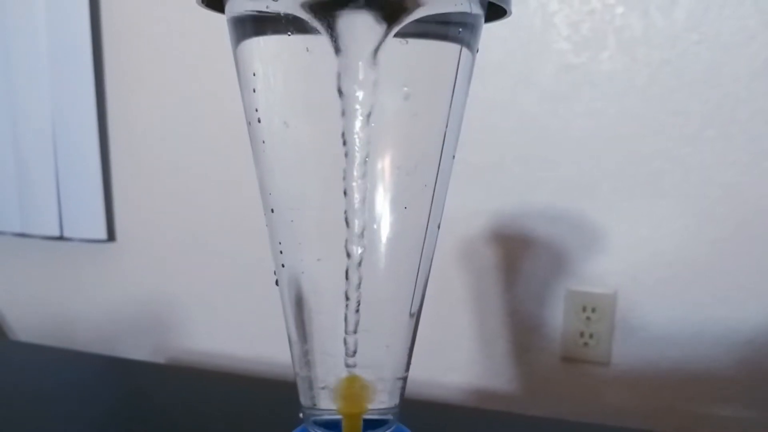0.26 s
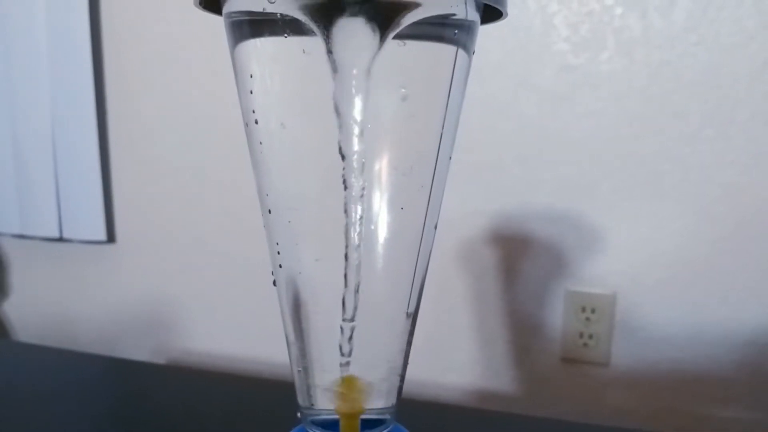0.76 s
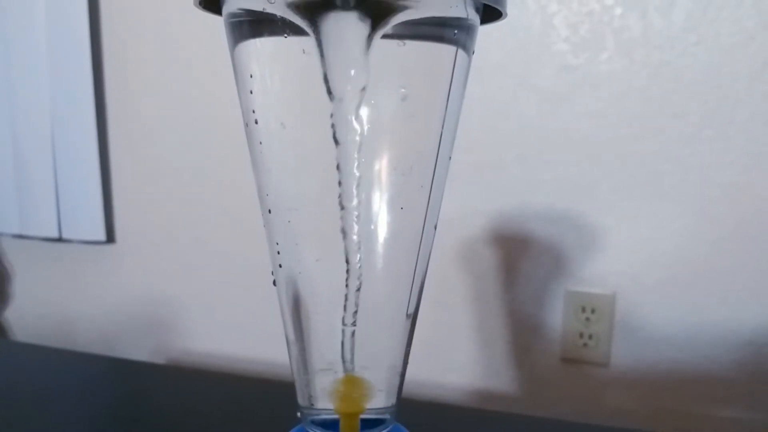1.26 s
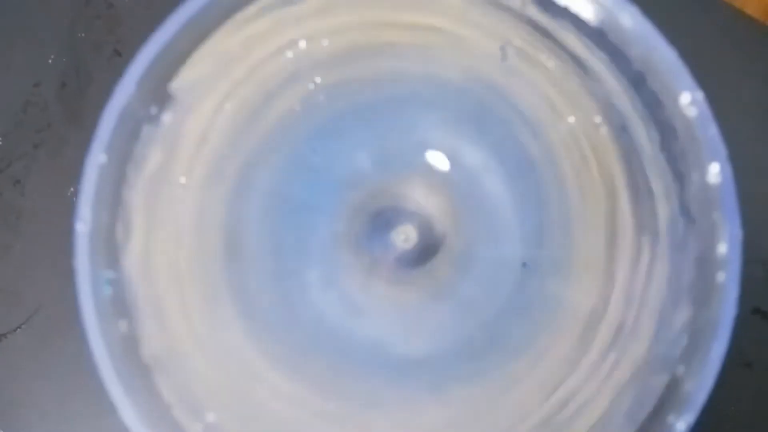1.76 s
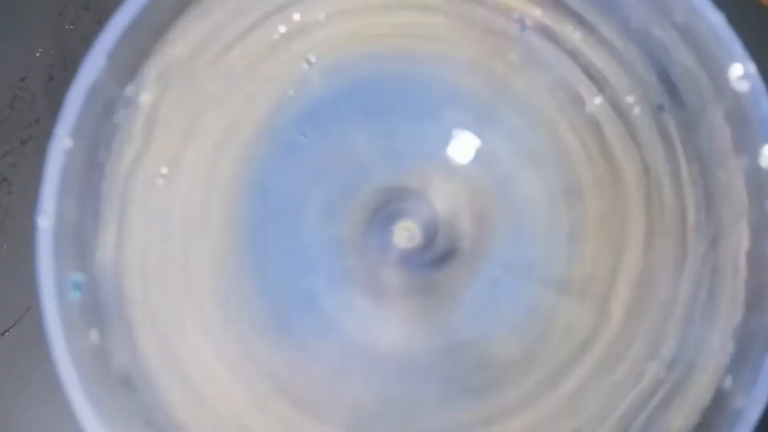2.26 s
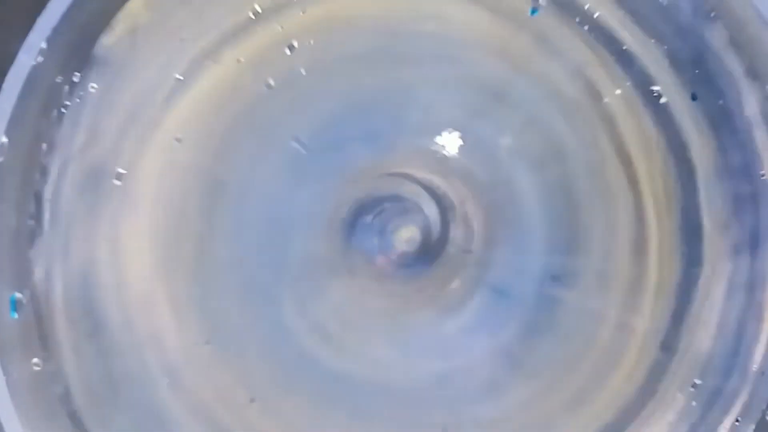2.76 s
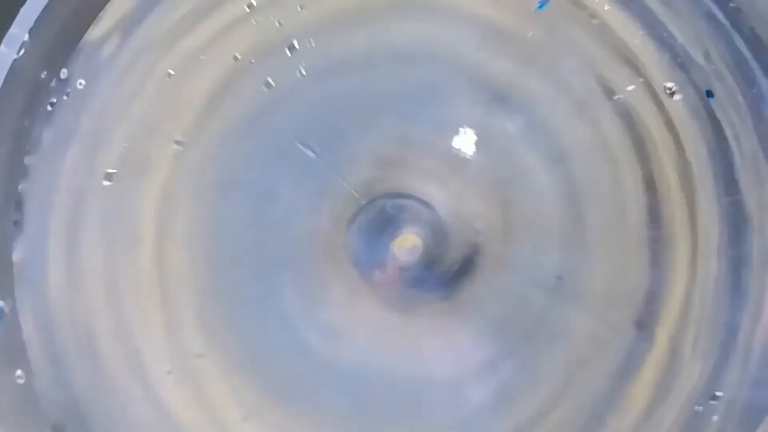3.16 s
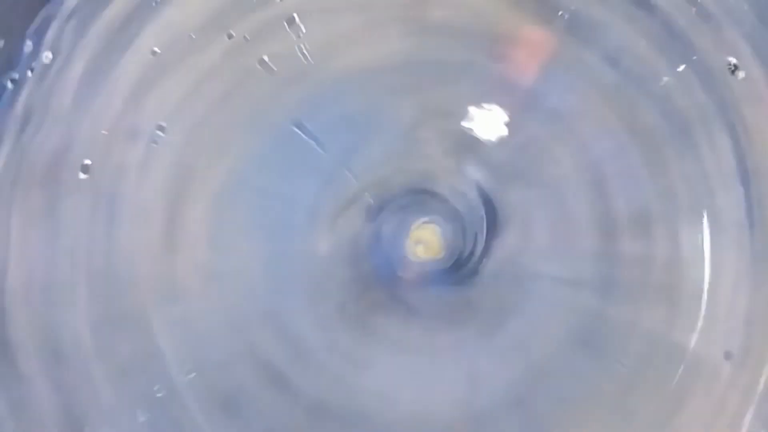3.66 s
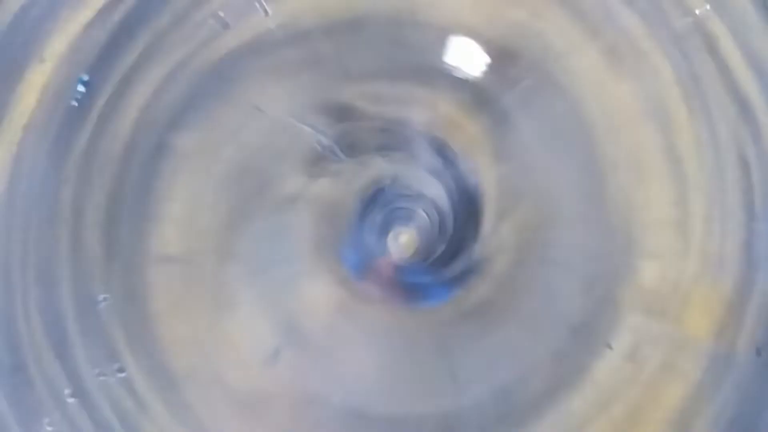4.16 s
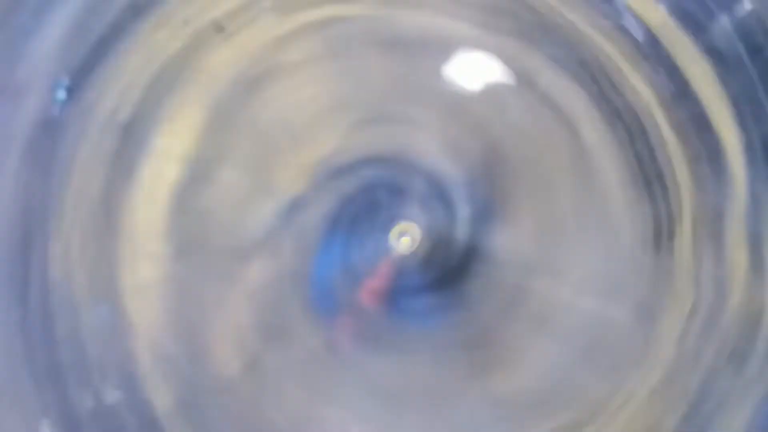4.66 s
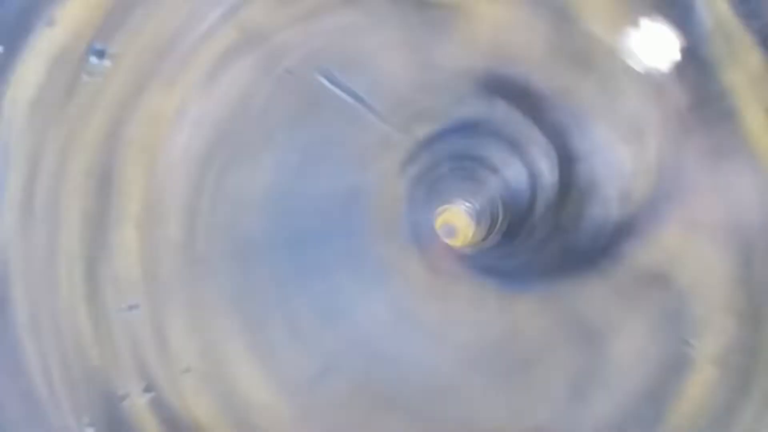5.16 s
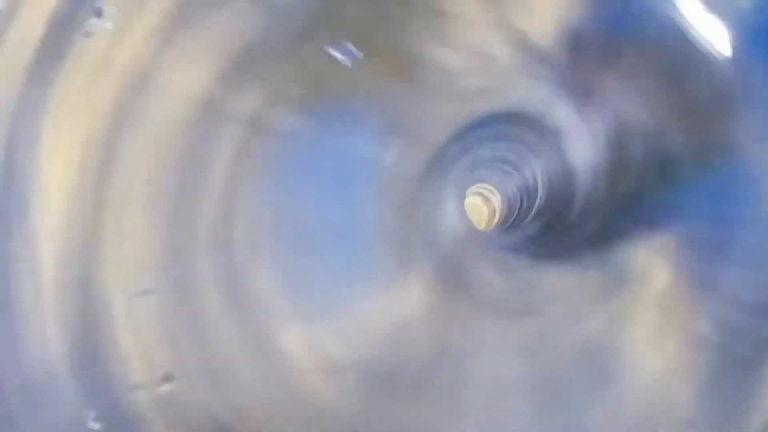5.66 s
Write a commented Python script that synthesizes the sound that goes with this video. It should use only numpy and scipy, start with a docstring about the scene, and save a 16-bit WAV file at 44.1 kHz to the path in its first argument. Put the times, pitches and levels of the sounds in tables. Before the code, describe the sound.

Bubbles fizz, crackle and ping in a small motor-driven whirlpool, growing into close, gulping gurgles above a faint low hum.

```python
"""Bubbles fizz, pop and ping in a toy water vortex, ringing the air in its clear plastic cone.
A small motor spins an impeller at the foot; the air core dips into the blades in gulps, a few a second,
and is chopped into bubbles. Behind them are the motor's faint hum and the low wash of a small room.
The stereo microphone stands first beside the cone, where a few soft swishes are heard, then from
about 1.75 s just above the open mouth, coming closer."""
import sys
import numpy as np
from scipy import signal
from scipy.fft import rfft, irfft
from scipy.io import wavfile
from scipy.ndimage import uniform_filter1d, map_coordinates

SR = 44100
rng = np.random.default_rng(int(sys.argv[2]) if len(sys.argv) > 2 else 0)


def store_pcm(level_fs):
    """Save levels as 16-bit WAV."""
    pcm = np.round(np.clip(level_fs, -1, 1) * 32767).astype(np.int16)
    wavfile.write(sys.argv[1], SR, np.atleast_2d(pcm).T)


N = 261072
TIME = np.arange(N) / SR
LEAVE_S, ARRIVE_S = 1.728, 1.762  # the side position fades out, the overhead position fades in
SHAFT_HZ = 44.35
CONE_SHIFT = 0.021  # share by which the resonances move as the water heaves

# The loudest bubbles, bursting with a crack.
# Each row: start in seconds, relative level in dB, pitch in Hz, relative share of fine spray in dB.
LOUD_POPS = [(0.1293, -41, 3390, 4), (0.3144, -34, 4220, -9), (0.3222, -30.5, 6630, -20),
             (0.5117, -29, 3350, -1), (0.78, -33, 4460, -6), (0.823, -36, 4150, -15),
             (0.842, -39, 5000, -6), (1.497, -33, 4440, -19), (1.578, -33.5, 5600, -7),
             (1.691, -36.5, 4470, -1), (1.775, -18.5, 4370, -35), (1.789, -20, 3420, -31),
             (1.8548, -27.5, 3500, -28), (1.8777, -18.5, 2980, -24), (1.8922, -27.5, 3370, -20),
             (1.9648, -24.5, 5400, 10), (2.0017, -29, 3940, 11), (2.1007, -28, 2880, -12),
             (2.1173, -25.5, 4180, 7), (2.128, -17.5, 4260, -13), (2.142, -25.5, 2800, -21),
             (2.16, -23, 2290, -23), (2.1737, -26.5, 2100, -7), (2.201, -22, 2600, -6),
             (2.2434, -30, 2200, -25), (2.255, -25, 2200, -37), (2.31, -32, 4900, -9),
             (2.333, -24.5, 4600, -10), (2.372, -25, 7200, 19), (2.467, -35, 6050, 18),
             (2.5414, -32, 2800, -20), (2.5577, -27, 3450, -12), (2.5947, -23.5, 3000, 4),
             (2.7395, -31, 2250, -25), (2.765, -30, 2290, -30), (2.7704, -25, 2140, -8),
             (2.780, -28.5, 2180, -8), (2.801, -23, 2750, -17), (2.8072, -21.5, 2730, -10),
             (2.8859, -23, 4200, -17), (2.9248, -29, 2770, -25), (2.951, -24, 2680, -41),
             (2.9641, -12, 3850, -39), (2.9791, -13.5, 4500, -47), (3.137, -25.5, 3380, -24),
             (3.167, -26.5, 2410, -25), (3.2209, -21, 3000, -26), (3.229, -22.5, 2540, -34),
             (3.2479, -27, 2600, -10), (3.2667, -26, 2580, 3), (3.2706, -18.5, 2940, -11),
             (3.283, -18.5, 1800, 0), (3.294, -28, 2830, -9), (3.305, -16, 3350, -11.5),
             (3.3619, -40, 2000, -19), (3.371, -26.5, 2640, -18), (3.38, -27.5, 2600, -5),
             (3.4053, -25, 3000, -23), (3.416, -19.5, 2670, -30), (3.4295, -22.5, 2540, -8),
             (3.439, -21.5, 3070, -6), (3.4457, -17, 3420, -23), (3.452, -20.5, 3500, -7),
             (3.461, -27, 3360, -3), (3.4738, -19.5, 3230, -19), (3.4848, -22.5, 3120, -11.5),
             (3.516, -26.5, 3100, -26), (3.6148, -25.5, 2900, 0), (3.6249, -25.5, 3200, -11),
             (3.7124, -34, 2160, -27), (3.7635, -29.5, 3920, -21), (3.92, -27.5, 3400, -18),
             (3.956, -20.5, 4100, -35), (3.979, -23.5, 4200, -9), (4.0009, -30.5, 2010, -7),
             (4.0133, -26.5, 1600, -18), (4.111, -20.5, 1290, -7.5), (4.149, -23.5, 2020, 18),
             (4.188, -29, 1670, -14), (4.3543, -19.5, 1870, -43), (4.4102, -33.5, 2030, 2),
             (4.4823, -26.5, 6300, 14), (4.5301, -29.5, 1900, -26), (4.593, -26, 2130, -24),
             (4.635, -25.5, 1400, -9), (4.667, -33, 1600, -13), (4.9815, -26.5, 1860, -30),
             (5.006, -24.5, 3130, -34), (5.0724, -23, 1830, -16), (5.2131, -30, 1600, -41),
             (5.2506, -29, 3240, -22), (5.2601, -25, 3200, -16), (5.2821, -27.5, 2700, -15),
             (5.36, -25.5, 1750, -20), (5.382, -24, 2270, -23), (5.3976, -22, 2260, -29),
             (5.411, -30, 1950, -28), (5.466, -18.5, 3480, -12.5), (5.549, -11, 2900, -36),
             (5.5614, -21.5, 3630, -6.5), (5.585, -21.5, 1820, -30), (5.6, -23, 2100, -5),
             (5.6283, -23, 1700, -11), (5.635, -23, 2270, -14), (5.6537, -27, 1600, -17),
             (5.676, -19, 1270, -16), (5.689, -17, 2150, -5.5), (5.7007, -27, 1950, -20),
             (5.713, -24, 2430, -17), (5.746, -24.5, 2400, -12.5), (5.796, -28, 2600, -6),
             (5.8076, -26, 1700, -6), (5.82, -11, 3230, -8.5), (5.8303, -19.5, 2380, -9),
             (5.8454, -18, 1970, -24), (5.865, -25, 1900, 4.5), (5.901, -22, 1840, -11),
             (5.912, -28, 2200, 4)]


def undb(db):
    """Decibels to gain."""
    return 10 ** (np.asarray(db) / 20)


def rms(x):
    """Root mean square."""
    return np.sqrt(np.mean(x ** 2)) + 1e-12


def curves(table):
    """Each column of a timed table, sample by sample."""
    s, *columns = np.transpose(table)
    return [np.interp(TIME, s, c) for c in columns]


def response(points, modes=(), size=4096):
    """Causal impulse response of a smooth colour (Hz, dB) with resonances (Hz, width in Hz, dB) on top."""
    hz = np.arange(size // 2 + 1) * SR / size
    point_hz, point_db = np.transpose(points)
    db = np.interp(np.log(hz + 1), np.log(point_hz), point_db)
    db += sum(lift / (1 + (2 * (hz - f) / width) ** 2) for f, width, lift in modes)
    cepstrum = irfft(np.log(undb(db)))
    cepstrum[1:size // 2] *= 2  # fold to minimum phase
    cepstrum[size // 2 + 1:] = 0
    return irfft(np.exp(rfft(cepstrum)))[:size // 2]


def through(x, ring):
    """Pass a sound through an impulse response."""
    return signal.fftconvolve(x, ring)[:len(x)]


def band_noise(hz, width_hz):
    """Noise in one resonance, rms 1."""
    x = signal.lfilter(*signal.iirpeak(hz, hz / width_hz, SR), rng.standard_normal(N))
    x = signal.lfilter(*signal.iirpeak(hz, hz / width_hz / 2, SR), x)
    return x / rms(x)


def walk(rate_hz):
    """A smooth random drift with a spread near 1."""
    return map_coordinates(rng.standard_normal(1024), [TIME * rate_hz], order=2, mode="wrap")


def rumble(db):
    """Low wash of the swirling water and the room, behind everything."""
    # Colour of the wash. Each row: frequency in Hz, relative level in dB.
    colour = [(20, -6), (45, -8.5), (70, 0), (110, 3), (180, 3), (280, -3), (450, -12), (900, -9),
              (3000, -10), (15000, -27)]
    wash = through(rng.standard_normal(N), response(colour))
    return undb(db + walk(5.88)) * wash / rms(wash)


def room(x, wet_db, t60_s, echo_db, echo_s):
    """One near reflection and a short diffuse tail whose pattern changes as the microphone moves."""
    t = TIME[:SR // 2]
    tails = rng.standard_normal((2, len(t))) * undb(-60 * t / t60_s) * np.minimum(t / 0.0031, 1)
    one, other = (through(x, tail / np.sqrt(np.sum(tail ** 2))) for tail in tails)
    turn = np.pi * 0.791 * TIME
    echo = np.pad(x, (int(echo_s * SR), 0))[:N]
    return x + undb(echo_db) * echo + undb(wet_db) * (np.cos(turn) * one + np.sin(turn) * other)


def motor_hum(overhead):
    """Harmonics of the shaft, whose speed wavers with the load."""
    # Each row: multiple of the shaft rate, level beside the cone in dB, level above it in dB.
    harmonics = [(3, -71, -75.5), (5, -83.5, -73), (8, -86.5, -85)]
    turns = np.cumsum(SHAFT_HZ * (1 + 0.0068 * walk(7))) / SR
    return sum(np.sqrt(2) * undb(above_db if overhead else beside_db) * np.sin(2 * np.pi * k * turns)
               for k, beside_db, above_db in harmonics)


def swishes():
    """Soft broad swishes swell and fade beside the cone."""
    # Each row: peak time in seconds, half-length in seconds, level in dB, tilt (higher is brighter).
    swells = [(0.27, 0.072, -60, -9), (0.383, 0.053, -49, 16), (0.438, 0.062, -58, -5),
              (1.485, 0.073, -51, -0.5), (1.696, 0.04, -59.5, -8.5)]
    out = 0
    for s, length, db, tilt in swells:
        colour = [(200, -41.5), (500, -14.0), (4000, 3 * tilt), (16000, 5 * tilt - 45)]
        noise = through(rng.standard_normal(N), response(colour))
        out += undb(db) * noise / rms(noise) * np.exp(-.5 * ((TIME - s) / length) ** 2)
    return out


def whistles():
    """Whistling and sizzling bands come and go above the mouth, flickering."""
    # Each row: peak time in seconds, half-length in seconds, centre in Hz, width in Hz, level in dB.
    bands = [(2.155, .2, 14800, 1100, -70), (2.194, 0.0022, 14300, 890, -39.5), (3, 0.017, 4430, 695, -54),
             (3.722, .13, 3540, 190, -57.5), (4.0, 0.2, 7440, 302, -59.5), (4.648, 0.43, 7420, 452, -61.5),
             (4.386, 0.041, 12400, 1800, -79), (4.58, 0.046, 12800, 5000, -60),
             (4.745, 0.016, 9000, 6000, -57), (5.8, 0.27, 11600, 600, -68), (5.85, 0.17, 13900, 3000, -66)]
    return sum(undb(db + walk(32)) * band_noise(hz, width) * np.exp(-.5 * ((TIME - s) / length) ** 2)
               for s, length, hz, width, db in bands)


def knocks(gain_db, decay_s):
    """Short dull knocks among the pops."""
    # Each row: start in seconds, peak in dB before gain_db.
    blows = [(3.279, -48), (4.012, -50), (4.635, -48.5)]
    dull = response([(60, 5), (250, 6), (900, 9), (2500, -17), (9000, -32)])
    t = TIME[:len(dull)]
    out = np.zeros(N)
    for s, db in blows:
        blow = through(rng.standard_normal(len(t)) * np.exp(-t / decay_s), dull)
        out[int(s * SR):][:len(blow)] += undb(db + gain_db) * blow / np.abs(blow).max()
    return out


def gulps(lag_s=0, stretch=1, rise_share=0.83):
    """Power of large bubbles, small bubbles and boom: each gulp swells quickly and dies more slowly."""
    # The core dips into the blades. Each row: peak time in seconds, fall time in seconds,
    # strength in dB, share of small bubbles in dB, share of boom in dB.
    dips = [(0.01, 0.037, -63, 11.5, -26), (0.283, 0.029, -60, 8.5, -22), (0.43, 0.039, -57, 3, -25),
            (0.72, 0.047, -66.5, 13, -10), (0.836, 0.046, -61.5, 9, -13), (0.988, 0.065, -58.5, 7.5, -12),
            (1.14, 0.044, -61.5, 7, -4), (1.412, 0.083, -56.5, 4, -14), (1.572, 0.028, -62, 8, 3),
            (1.706, 0.034, -52, 2.5, -3), (1.78, 0.022, -52.5, 4, -23), (1.875, 0.036, -50.5, 3.5, -10),
            (2.13, 0.093, -46.5, -2, -11), (2.282, 0.054, -53, -1, -3.5), (2.563, 0.051, -45.5, -1, -10.5),
            (2.792, .045, -45.5, -0.5, -16), (2.968, 0.035, -44, -0.5, -12.5),
            (3.132, 0.055, -52, -6.5, -4.5), (3.301, 0.076, -46.5, -3.5, -4.5),
            (3.445, 0.073, -47, -1.5, -6), (3.625, 0.053, -48, 0.5, -5.5), (3.76, 0.036, -54.5, 0.5, -5.5),
            (3.92, 0.07, -49.5, -3, -12), (4.111, 0.056, -41.5, -5, -11.5), (4.384, .035, -47, -2, -29),
            (4.576, .07, -42.5, -5.5, -16), (4.794, 0.057, -47, -3, -17), (4.987, 0.054, -45, -5, -25),
            (5.114, 0.052, -52, -5, -9), (5.24, .05, -44.5, 0.5, -22), (5.405, 0.037, -44, -1, -15),
            (5.607, 0.045, -48, -1.5, -5.5), (5.685, 0.063, -44, -4.5, -9.5), (5.835, .04, -42.5, -2, -5.5)]
    power = np.zeros((3, N))
    for s, length, db, small_db, boom_db in dips:
        age = (TIME - s - lag_s) / (length * stretch)
        swell = np.exp(-np.where(age < 0, age / rise_share, age) ** 2)
        power += np.outer(undb([db, db + small_db, db + boom_db]) ** 2, swell)
    return power


def boom(gain_db, wash_db, hz=220):
    """Each gulp sets the air in the funnel booming on one throbbing note, with a soft wash of water."""
    swell = np.sqrt(gulps(lag_s=0.013, stretch=1.14)[2])  # the air answers late and lingers
    turns = np.cumsum(hz * (1 + 0.03 * walk(35))) / SR
    note = np.sqrt(2) * np.sin(2 * np.pi * turns) * undb(3.5 * walk(45))
    wash = undb(-5.0) * band_noise(181, 120) + undb(wash_db) * band_noise(760, 630)
    return undb(gain_db) * swell * (note + wash)


def retuned(cone, shift):
    """The ring of the cone with every resonance moved by a small share."""
    return map_coordinates(cone, [np.arange(len(cone)) * (1 + shift)], order=5)


def heaving(x, cone):
    """Ring the cone while the heaving water moves it between a lower and a higher tuning."""
    blend = .5 + .5 * np.tanh(2 * walk(5.0))
    low, high = (through(x, retuned(cone, shift)) for shift in (-CONE_SHIFT, CONE_SHIFT))
    return (1 - blend) * low + blend * high


def sway(x, width_hz):
    """Add the funnel's upper resonance, which shifts as the core sways."""
    # Each row: time in seconds, centre in Hz, gain added at the centre.
    path = [(3.2, 3410, 0.05), (3.8, 3570, 1.2), (4.5, 3450, 0.23), (5.0, 3480, 1.1), (5.12, 3480, 0.65),
            (5.2, 3260, 0.68), (5.28, 3620, 1.5), (5.35, 3300, 0.83), (5.465, 3220, 2.3),
            (5.55, 3285, 0.37), (5.6, 3440, 1.1), (5.65, 3320, 3), (5.82, 3284, 2.15), (5.9, 3420, 0.73)]
    hz, gain = curves(path)
    turn = np.exp(2j * np.pi * np.cumsum(hz) / SR)
    pole = np.exp(-np.pi * width_hz / SR)
    return x + gain * 2 * np.real(turn * signal.lfilter([1 - pole], [1, -pole], x / turn))


def close_in(x):
    """As the microphone nears the mouth, some resonances stand out and others sink."""
    # Each row: centre in Hz, width in Hz, lift in dB.
    near_modes = [(864, 1140, -4), (1688, 195, 10), (3040, 380, -4.5), (4176, 170, 7), (4960, 1340, -5),
                  (6000, 320, 2.5), (8230, 380, 5), (11670, 310, 4.5), (13200, 560, -5)]
    # Each row: time in seconds, closeness from 0 to 1.
    approach = [(3.8, 0.58), (5.1, 1), (5.55, 1)]
    near = curves(approach)[0]
    return (1 - near) * x + near * through(x, response([(20, 0), (20000, 0)], near_modes))


def bubble(hz, cycles, glide, size=512):
    """A bubble rings for a few cycles, its pitch rising by up to the share glide as it leaves the core."""
    t = np.arange(size) / SR
    age = hz * t / cycles
    return np.exp(-age) * np.sin(2 * np.pi * hz * t * (1 + glide * age / (1 + age)))


def pings(from_s, to_s, gain_db, rough, rise_s=0.00095):
    """Free bubbles ring like tiny bells, shaken by the swirl and rising a little in pitch as they fade."""
    # Each row: start in seconds, peak in dB before gain_db, pitch in Hz, decay in seconds.
    free_bubbles = [(0.051, -50, 1610, 0.0044), (0.1284, -34, 3300, .0022), (0.212, -45.5, 1780, .006),
                    (0.254, -39, 4080, .003), (0.273, -40, 4080, 0.0026), (0.3005, -38, 4180, .002),
                    (0.3142, -28, 3300, 0.0025), (0.467, -37, 3050, 0.0015), (0.4933, -41, 4150, .003),
                    (0.5646, -37, 4150, 0.0033), (0.648, -38, 4220, 0.0037), (0.676, -49, 1550, 0.0045),
                    (0.688, -43, 3440, .003), (0.7183, -33, 4960, 0.0033), (0.733, -37, 5400, 0.0018),
                    (0.8073, -33, 5280, 0.0018), (1.1012, -35.5, 4470, .002), (1.1386, -34.5, 4100, 0.0039),
                    (1.2433, -38, 5200, .0025), (1.302, -36, 4140, 0.0037), (1.321, -37, 5070, .002),
                    (1.3848, -39, 3000, 0.0022), (1.558, -33, 3230, 0.0023), (1.676, -40, 5240, .0025),
                    (2.04, -34, 4090, 0.0023), (2.079, -32.5, 3150, 0.0043), (2.982, -54.5, 434, 0.032),
                    (3.543, -32, 3290, 0.0044), (3.66, -39, 3480, .005), (3.79, -44, 3540, 0.0046),
                    (5.005, -26, 3324, 0.0038), (5.008, -33, 1990, 0.01), (5.023, -33, 2130, 0.0065),
                    (5.037, -30, 2230, 0.0051), (5.0722, -18, 2196, 0.0021), (5.074, -29, 1243, 0.0038),
                    (5.191, -43, 3360, .005), (5.8471, -18, 1766, 0.0025)]
    t = TIME[:SR // 6]
    out = np.zeros(N + len(t))
    for s, db, hz, decay_s in free_bubbles:
        if from_s <= s < to_s:
            shake = 1 + rough * np.sqrt(32) * uniform_filter1d(rng.standard_normal(len(t)), size=32)
            ring = shake * bubble(hz, hz * decay_s, glide=0.026, size=len(t)) * (1 - np.exp(-t / rise_s))
            out[int(s * SR):][:len(t)] += undb(db + gain_db) * ring / np.abs(ring).max()
    return out[:N]


def splutter(spread_db, chop_db, cluster_db, count):
    """Tears in the air core (sample, dB), louder in clusters and when one of the two blades cuts it."""
    when, size = rng.random((count, 2)).T
    at = (when * N).astype(int)
    strength = np.minimum(-np.log(1 - size), 3.6)
    blade = np.cos(2 * np.pi * 2 * SHAFT_HZ * at / SR)
    return at, spread_db * strength + chop_db * blade + cluster_db * np.tanh(walk(70)[at])


def swarm(tears, low_hz, high_hz, cycles, scatter_db, count, burst_s=.0006):
    """Each tear sheds count bubbles of random size within a millisecond or so."""
    start, db = tears
    db = np.repeat(db + scatter_db * (2 * rng.random(len(db)) - 1), count)
    pitch, size, life, lag, sign = rng.random((len(db), 5)).T
    start = np.repeat(start, count) + (-np.log(1 - lag) * burst_s * SR).astype(int)
    hz = low_hz * (high_hz / low_hz) ** pitch
    push = np.sign(sign - .5) * undb(db) * (.5 + size)
    waves = push[:, None] * bubble(hz[:, None], cycles * (.5 + life[:, None]), glide=0.064, size=256)
    samples = start[:, None] + np.arange(256)
    return np.bincount(samples.ravel(), waves.ravel(), N)[:N]


def spurts(cone, octaves, cycles, gain_db):
    """A strip of the core shreds into a splashy cloud of small bubbles."""
    # Each row: middle in seconds, half-length in seconds, level in dB before gain_db, mid pitch in Hz.
    shreds = [(0.846, 0.0052, -44, 4260), (1.507, 0.005, -44, 4700), (1.564, 0.0028, -40, 4570),
              (1.5745, 0.0016, -37, 4100), (1.582, .0045, -46, 5000), (1.701, 0.0058, -41.5, 4000)]
    out = 0
    for s, length, db, hz in shreds:
        at = ((s + length * 1.6 * (2 * rng.random(40) - 1)) * SR).astype(int)
        tears = at, np.zeros(len(at))
        cloud = swarm(tears, hz / 2 ** octaves, hz * 2 ** octaves, cycles, scatter_db=7, count=2)
        cloud = through(cloud, cone)
        out += undb(db + gain_db) * cloud / np.sqrt(np.sum(cloud ** 2) / (np.pi * length * SR))
    return out


def airflow(large_db, small_db, hiss, hiss_db, spray_db=-8):
    """Gain of the large, small and finest bubbles: a trickle of air with the gulps on top."""
    large, small, _ = gulps()
    finest = undb(curves(hiss)[0] + hiss_db) ** 2 + undb(spray_db) ** 2 * small
    return np.sqrt([undb(large_db) ** 2 + large, undb(small_db) ** 2 + small, finest])


def fizz(flows, cone, tears, cycles, haze_db):
    """Three sizes of bubble, each following its share of the air, ring the cone with a haze of tiny ones."""
    large = swarm(tears, 1048, 2216, cycles=1.0, scatter_db=0.5, count=2)
    small = swarm(tears, 2710, 5280, cycles=cycles, scatter_db=-1.5, count=2)
    finest = swarm(tears, 5720, 15300, cycles=8.9, scatter_db=16.0, count=3)
    haze = through(rng.standard_normal(N), response([(2500, -14.5), (5500, -16.0), (15500, -12.0)]))
    finest = finest / rms(finest) + undb(haze_db) * haze / rms(haze)
    bubbles = sum(x * flow / rms(through(x, cone)) for x, flow in zip((large, small, finest), flows))
    return heaving(bubbles, cone)


def stray_pops(flow, from_s, over_db, scatter_db, low_hz, high_hz, spray_db, count):
    """Rows for lesser pops at random: the more air is drawn in, the more frequent and louder they are."""
    turn, size, pitch = rng.random((count, 3)).T
    drawn = np.cumsum(flow * (TIME > from_s))
    at = np.searchsorted(drawn, drawn[-1] * (np.arange(count) + turn) / count)
    levels = 20 * np.log10(flow[at]) + over_db + scatter_db * (2 * size - 1)
    pitches = low_hz * (high_hz / low_hz) ** pitch
    return [(s, db, hz, spray_db) for s, db, hz in zip(TIME[at], levels, pitches)]


def pops(rows, cone, cycles, crack, thud_db, spray_db, spit_s, rebound, rebound_s, gain_db):
    """A large bubble tears off with a crack and a spit, rings, and is kicked twice by the closing water."""
    thud = response([(400, -13), (700, -6.5), (1100, 11.5), (4800, -24.5), (7000, -19), (14000, -55)])
    spray = response([(2000, -8.5), (5500, 0.5), (9000, 2.0), (12000, 1.0), (15500, -3.5)])
    t = TIME[:len(cone)]
    out = np.zeros(N + len(cone))
    for (s, db, hz, sharp_db), (life, heave, *kicks) in zip(rows, rng.random((len(rows), 4))):
        spit = rng.standard_normal(len(t)) * np.exp(-t / spit_s)
        spit[0] += crack  # the neck of air snaps at once, the spit trails it
        push = undb(thud_db) * through(spit, thud) + undb(spray_db + sharp_db) * through(spit, spray)
        ring = bubble(hz, cycles * (0.27 + .5 * life), glide=0.052)
        push[:len(ring)] += ring
        for k, kick in enumerate(kicks, 1):
            late = int(rebound_s * (k + .6 * (kick - .5)) * SR)
            push[late:late + len(ring)] += rebound ** k * ring
        pop = through(push, retuned(cone, CONE_SHIFT * (2 * heave - 1)))
        crest = np.sqrt(2 * uniform_filter1d(pop ** 2, size=44, mode="constant").max())
        out[int(s * SR):][:len(pop)] += undb(db + gain_db) * pop / crest
    return out[:N]


def beside_cone():
    """Microphone beside the cone: the plastic wall holds back the large bubbles."""
    # Colour through the wall. Each row: frequency in Hz, gain in dB.
    wall = [(100, -49), (400, -12.5), (800, -11.5), (1250, -18), (2500, -6.5), (3300, 8.5), (5200, 5),
            (8300, 7), (10500, -7.5), (16000, -22)]
    # The cone's resonances from the side. Each row: centre in Hz, width in Hz, lift in dB.
    wall_modes = [(920, 280, 15.5), (1540, 220, 15.5), (1956, 210, 17), (2940, 180, 0.5), (4130, 160, 9.5),
                  (5270, 900, 9.5), (7300, 290, 2)]
    # Finest fizz between gulps. Each row: time in seconds, relative level in dB.
    hiss = [(0.0, -55), (0.416, -60.5), (0.538, -58.5), (1.562, -58.5), (1.7, -56.5)]
    cone = response(wall, wall_modes)
    tears = splutter(spread_db=2.5, chop_db=1.1, cluster_db=2.0, count=1700)
    flows = airflow(large_db=-66.0, small_db=-60.0, hiss=hiss, hiss_db=3.5)
    water = undb(-0.5) * fizz(flows, cone, tears, cycles=10.6, haze_db=9)
    water += spurts(cone, octaves=0.64, cycles=5.0, gain_db=-3.0)
    rows = [row for row in LOUD_POPS if row[0] < LEAVE_S]
    water += pops(rows, cone, cycles=7.2, crack=0.93, thud_db=-36.0, spray_db=3.0, spit_s=0.0037,
                  rebound=0.61, rebound_s=0.001276, gain_db=-2.0)
    water += pings(0, LEAVE_S, gain_db=-1.5, rough=0.51)
    heard = room(water, wet_db=-9.0, t60_s=0.3, echo_db=-27.0, echo_s=0.0072)
    return heard + boom(-6.5, wash_db=-13.0) + swishes() + motor_hum(overhead=False) + rumble(-66.5)


def above_mouth():
    """Microphone just over the mouth: the pops are close and clear, and the air in the funnel booms."""
    # Colour out of the mouth. Each row: frequency in Hz, gain in dB.
    mouth = [(100, -19), (350, -17.5), (650, -25.5), (850, -10.5), (1050, -3), (1450, -1.5), (2250, -1.5),
             (2650, -4.5), (3100, 3), (4500, 8), (5400, 5), (8800, -6), (10300, -10.5), (15500, -8.5)]
    # The cone's resonances from above. Each row: centre in Hz, width in Hz, lift in dB.
    mouth_modes = [(1176, 86, 8.8), (1720, 36, 4.4), (2027, 54, 11.4), (2252, 165, 10.5), (3336, 180, 5.8),
                   (4410, 170, 2.5), (5930, 52, 2), (7000, 37, 1.2), (8990, 170, 8), (10800, 60, 6.6),
                   (13600, 270, 2)]
    # Finest fizz between gulps. Each row: time in seconds, relative level in dB.
    hiss = [(1.8, -56.5), (2.18, -56), (2.64, -58), (3.25, -57), (3.49, -59), (3.65, -58), (4.63, -55.5),
            (4.77, -56), (5.06, -62), (5.29, -57.5), (5.79, -54), (5.92, -52)]
    cone = response(mouth, mouth_modes)
    tears = splutter(spread_db=1.55, chop_db=0.8, cluster_db=1.0, count=1300)
    flows = airflow(large_db=-50.0, small_db=-56.5, hiss=hiss, hiss_db=3.0)
    water = undb(-3.0) * fizz(flows, cone, tears, cycles=15.0, haze_db=4.5)
    rows = [row for row in LOUD_POPS if row[0] > LEAVE_S]
    rows += stray_pops(flows[1], ARRIVE_S, over_db=9, scatter_db=4.5, low_hz=1760, high_hz=3760,
                       spray_db=-10, count=14)
    water += pops(rows, cone, cycles=2.13, crack=4.46, thud_db=-6.5, spray_db=4.0, spit_s=0.0013,
                  rebound=0.75, rebound_s=.0017, gain_db=-7.0)
    water = sway(close_in(water), width_hz=76) + pings(LEAVE_S, TIME[-1], gain_db=-3.0, rough=0.17)
    heard = room(water, wet_db=-7.0, t60_s=0.64, echo_db=-16.0, echo_s=0.011)
    heard += boom(-7.5, wash_db=-7.5) + whistles() + knocks(gain_db=1.5, decay_s=0.0033)
    return heard + motor_hum(overhead=True) + rumble(-67.0)


def scene():
    """The side position gives way to the overhead one, heard by two slightly unlike microphone ports."""
    # Resonances in which the ports differ.
    # Each row: centre in Hz, width in Hz, share added to the left and taken from the right.
    ports = [(1900, 254, 0.32), (4360, 1700, -0.012), (9450, 310, -0.36), (13000, 2500, 0.031)]
    fade_out = np.clip((LEAVE_S - TIME) / 0.018 + .5, .12, 1) * (TIME < ARRIVE_S)
    fade_in = np.clip((TIME - ARRIVE_S) / 0.049 + .5, 0, 1)
    mid = beside_cone() * fade_out + above_mouth() * fade_in
    side = sum(share * signal.lfilter(*signal.iirpeak(hz, hz / width, SR), mid)
               for hz, width, share in ports)
    return np.array([mid + side, mid - side])


def record(dry):
    """Each microphone channel adds its own faint noise; the recorder cuts the top at 15.8 kHz."""
    colour = response([(20, 27), (120, 29), (250, -5), (1200, -14), (2000, 41), (3000, 10),
                       (6000, -25), (9700, 28), (10800, 5), (13000, 17), (15500, 12)])
    hiss = np.array([through(rng.standard_normal(N), colour) for _ in dry])
    top_cut = signal.ellip(10, .2, 70, 15800, fs=SR, output="sos")
    return signal.sosfilt(top_cut, dry + undb(-79.5) * hiss / rms(hiss))


dry = scene()
out = record(dry)
store_pcm(out)
```